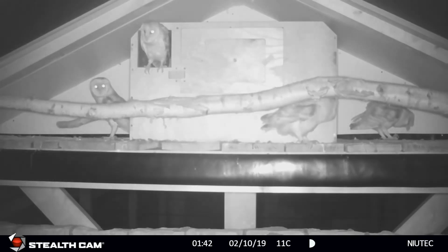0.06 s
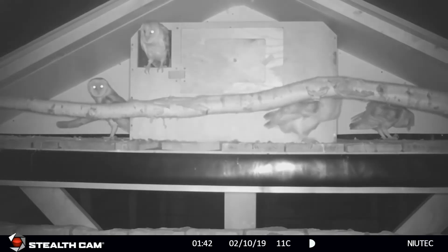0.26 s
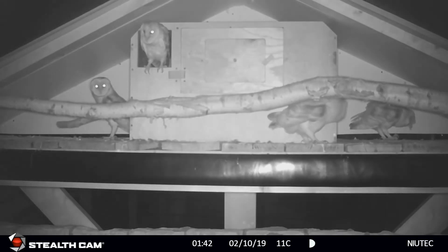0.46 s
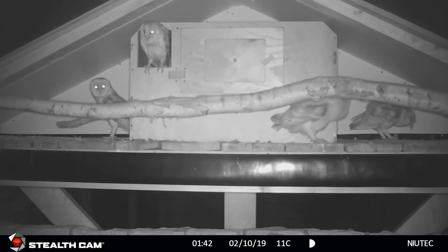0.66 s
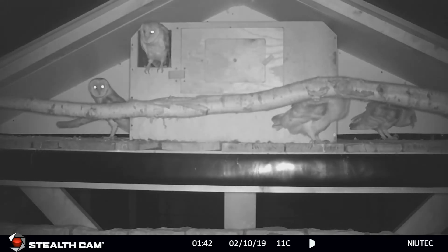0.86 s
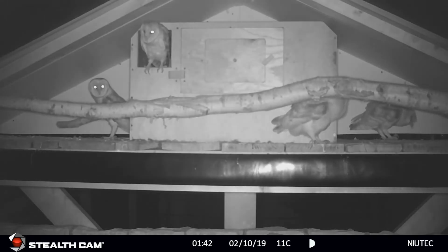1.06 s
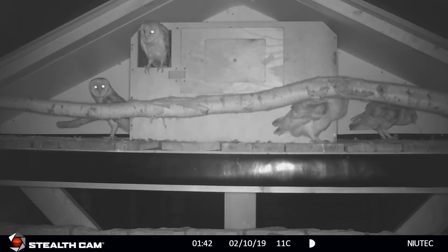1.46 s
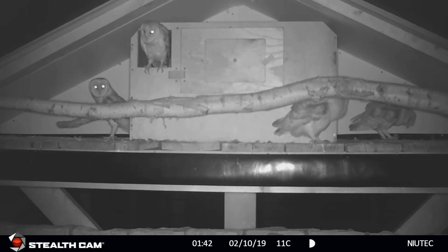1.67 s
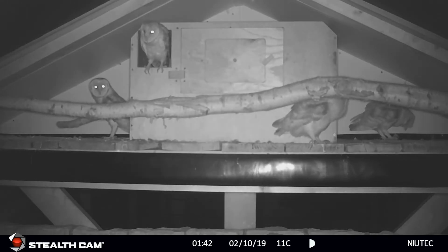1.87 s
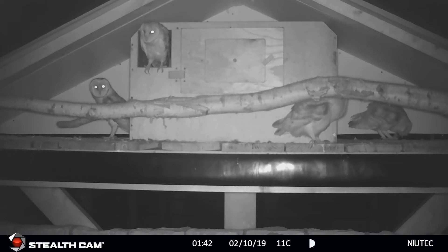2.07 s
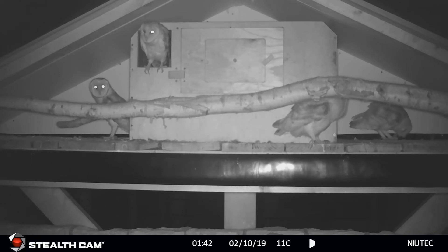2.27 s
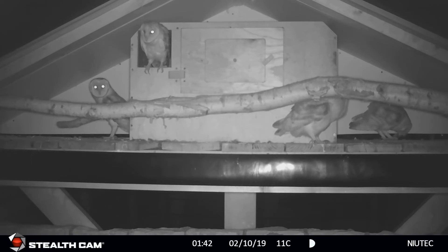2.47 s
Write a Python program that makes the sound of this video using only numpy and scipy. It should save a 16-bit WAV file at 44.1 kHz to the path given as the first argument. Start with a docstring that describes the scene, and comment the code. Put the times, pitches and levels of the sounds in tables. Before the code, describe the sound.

A barn owl screeches in a wooden loft. After a soft microphone pop at the very start, the harsh, rasping screech sputters in at about 0.1 seconds, swells loud and stops just before 1 second. From about 1.7 to 2.2 seconds comes a much softer, thinner owl hiss. Each call rings briefly off the boards, and faint steady background noise runs throughout.

```python
"""Barn owls in a wooden loft

Heard in mono on a trail camera. One owl gives a long, harsh screech: rushing air and irregular spits
of its throat, with a fixed colour. A softer, thinner hiss follows close to the boards, the beak
opening and closing. The loft rings briefly; the camera starts with a soft pop over faint steady noise."""
import sys
import numpy as np
from scipy import signal
from scipy.fft import rfft, irfft, next_fast_len
from scipy.io import wavfile
from scipy.ndimage import uniform_filter1d, minimum_filter1d

SR = 44100
rng = np.random.default_rng(int(sys.argv[2]) if len(sys.argv) > 2 else 0)


def digitize_waveform(pressure):
    """Quantize a signal to 16-bit integers and store it at the path in sys.argv[1].

    Rows of a 2-D input are taken as channels; values are limited to [-1, 1].
    """
    field = np.atleast_2d(pressure).T
    bounded = np.clip(field, -1, 1)
    quanta = np.round(bounded * 32767).astype(np.int16)
    wavfile.write(sys.argv[1], SR, quanta)


N = 110250

# broad shape of the screeching owl's throat: f/Hz, gain/dB
SCREECH_THROAT = [(300, -36), (550, -34), (1100, -36.5), (1900, -28), (2600, -9.5), (4000, 0.0),
                  (6200, -0.5), (7500, -11.5), (9000, -13), (11300, -18.4), (12700, -34.6), (15500, -35)]
# sharp peaks and dips from throat, near boards and microphone: f/Hz, width/Hz, gain/dB
SCREECH_PEAKS = [(2530, 71, -7), (3160, 185, -8.5), (3760, 50, -2.5), (4190, 310, 4.5), (4500, 98, 6),
                 (4647, 400, -11.5), (5330, 160, -7.5), (5620, 50, 2), (6780, 270, -7.5), (6960, 50, 8.5),
                 (7464, 350, 8.5), (8100, 410, -12.5), (8250, 200, 9), (9090, 450, -11), (10100, 350, -6.5),
                 (10670, 100, 4)]


def amp(db):
    """Decibels to gain."""
    return 10 ** (np.asarray(db) / 20)


def unit(x):
    """Scaled to rms 1."""
    return x / np.sqrt(np.mean(x ** 2) + 1e-20)


def along(points, hz):
    """A table of f/Hz, value, read on a log frequency axis."""
    f, values = np.transpose(points)
    return np.interp(np.log(hz + 1), np.log(f + 1), values)


def curve(rows, column=1, outside=None):
    """One column of a timed table, per sample."""
    rows = np.array(rows)
    return np.interp(np.arange(N) / SR, rows[:, 0], rows[:, column], outside, outside)


def coloured(x, gain_db):
    """x through a minimum-phase filter whose gain in dB is a function of frequency."""
    m = 2 * next_fast_len(N)
    cepstrum = irfft(np.log(amp(gain_db(np.fft.rfftfreq(m, 1 / SR))) + 1e-6))
    cepstrum[1:m // 2] *= 2
    cepstrum[m // 2 + 1:] = 0
    return irfft(rfft(x, m) * np.exp(rfft(cepstrum)))[:N]


def noise(colour):
    """Steady noise of rms 1, shaped by a table of f/Hz, gain/dB."""
    return unit(coloured(rng.standard_normal(N), lambda f: along(colour, f)))


def camera_noise(start_s=.039, floor_db=-52, pop_db=-25.5, pop_decay_s=.0087):
    """The microphone comes on with a soft pop; then steady noise and a faint mains hum."""
    # colour of the noise floor: f/Hz, gain/dB
    floor_colour = [(15, -25), (28, -2), (90, -4.5), (260, -7), (500, -10), (1000, -15), (2000, -18.5),
                    (4000, -22.5), (9000, -24.5), (12500, -28.5), (15700, -32)]
    # mains lines: f/Hz, level/dB
    mains = [(60, -66), (120, -67), (181, -66)]
    t = np.arange(N) / SR - start_s
    floor = amp(floor_db) * noise(floor_colour)
    hum = sum(amp(db) * unit(np.sin(2 * np.pi * (hz * t + rng.random()))) for hz, db in mains)
    pop = amp(pop_db) * np.exp(-abs(t) / pop_decay_s)
    return (t >= 0) * (floor + hum + pop)


def loft(level_db, colour, wet_db):
    """The short diffuse ring of the wooden loft, fed by noise that follows a call's level."""
    # ring time of the loft: f/Hz, T60/s
    t60 = [(500, 0.31), (5000, .43), (12000, .35)]
    hz, t, bands = signal.stft(rng.standard_normal(SR // 2), SR, nperseg=256)
    decay = amp(-60 * t / along(t60, hz)[:, None])
    tail = signal.istft(bands * decay, SR, nperseg=256)[1]
    feed = amp(level_db + wet_db) * noise(colour)
    return signal.fftconvolve(feed, tail / np.linalg.norm(tail))[:N]


def walls(x, echo_db, count=14, spread_s=.03):
    """Near boards add weak early reflections."""
    delays = (rng.uniform(.1, 1, count) * spread_s * SR).astype(int)
    echoes = sum(rng.choice([-1, 1]) * np.pad(x, (d, 0))[:N] for d in delays)
    return x + amp(echo_db) * echoes / np.sqrt(count)


def airflow(level_db, colour, top_db, growth=.25):
    """Plain rushing air that lasts as long as the call and grows only slowly with its effort."""
    gain = amp(top_db + growth * (level_db - level_db.max())) * (level_db > -100)
    return gain * noise(colour)


def rasp(spits_per_s, spit_share, scatter_db=2.5, low_hz=1800):
    """Turbulent air that, above low_hz, breaks into spits of uneven spacing and size."""
    air, chance = rng.standard_normal(N), rng.standard_normal((N // 8, 3))
    due = np.flatnonzero(np.diff(np.floor(np.cumsum(spits_per_s) / SR)))[:len(chance)]
    late, size, sign = chance[:len(due)].T
    at = (due + .4 * late * SR / spits_per_s[due]).astype(int) % N  # jitter: 0.4 of the mean interval
    kicks = np.sign(sign) * amp(scatter_db * np.clip(size, -2, 2))
    spits = unit(np.bincount(at, kicks, N) / np.sqrt(spits_per_s))
    f = np.fft.rfftfreq(N, 1 / SR)
    spit_power = spit_share * f ** 4 / (f ** 4 + low_hz ** 4)
    return irfft(np.sqrt(spit_power) * rfft(spits) + np.sqrt(1 - spit_power) * rfft(air), N)


def call_colour(x, shape, peaks):
    """Fixed colour as heard: the throat's broad shape; peaks and dips from throat, boards and mic."""
    def gain_db(f):
        return along(shape, f) + sum(db / (1 + (2 * (f - hz) / width) ** 2) for hz, width, db in peaks)
    return coloured(x, gain_db)


def voiced(air, level_db, shape, peaks, fully_weak_db=18.5):
    """Air given a call's colour and level; with less effort it is flatter and a little brighter."""
    # change of colour in a weak call: f/Hz, gain/dB
    weak_colour = [(500, 4), (1500, 5.5), (2800, 1.5), (4200, -2.5), (6200, 0.5), (8500, 2.5), (11000, 2.5),
                   (14000, 1.5)]
    full = unit(call_colour(air, shape, peaks))
    weak = unit(coloured(full, lambda f: along(weak_colour, f)))
    weakness = np.clip((level_db.max() - level_db) / fully_weak_db, 0, 1)
    return amp(level_db) * (weakness * weak + (1 - weakness) * full)


def beak(width_hz=310):
    """A narrow band of noise that rises and falls as the beak opens and closes."""
    # beak resonance: t/s, f/Hz, level/dB
    resonance = [(1.72, 1400, -77), (1.77, 1616, -63), (1.92, 2050, -60), (2.07, 2020, -58),
                 (2.12, 1620, -56), (2.145, 1265, -56), (2.17, 1120, -80)]
    lowpass = signal.butter(2, width_hz / 2, fs=SR, output='sos')
    slow = signal.sosfilt(lowpass, rng.standard_normal((2, N)))
    phase = 2 * np.pi * np.cumsum(curve(resonance)) / SR
    band = unit(slow[0] * np.cos(phase) + slow[1] * np.sin(phase))
    return amp(curve(resonance, column=2, outside=-120)) * band


def soft_hiss(spits_per_s=1200):
    """An owl close to the boards hisses thinly, more air than spits."""
    # effort of the hiss: t/s, level/dB
    effort = [(1.742, -63), (1.765, -50), (1.80, -45), (1.832, -37.5), (1.95, -34.5), (2.05, -34.5),
              (2.11, -43), (2.15, -62)]
    # broad shape of this owl's throat: f/Hz, gain/dB
    shape = [(300, -31.5), (580, -21), (900, -35.5), (2200, -20.5), (3300, -26.5), (4300, -14.5),
             (5400, -17), (6100, -0.5), (7500, -8), (8400, -25), (10400, -23), (15000, -45.5)]
    # sharp peaks and dips from throat, near boards and microphone: f/Hz, width/Hz, gain/dB
    peaks = [(4120, 110, 7.5), (4600, 130, -4.5), (4910, 74, 4.5), (5260, 100, -10), (5630, 77, -7.5),
             (5970, 88, 5), (6410, 590, -9.5), (6560, 120, 9), (6970, 100, -9), (10100, 80, 5.5)]
    # colours of the plain airflow and of the loft's answer: f/Hz, gain/dB
    flow_colour = [(300, -8), (600, 0), (900, -12), (1700, -3), (3200, -6), (4300, 2), (5300, -6),
                   (12000, -20)]
    ring_colour = [(1000, -22), (4000, -14), (5500, -11), (6400, -1), (7400, -4.5), (8500, -17),
                   (14000, -32)]
    # echoes off the boards beside the owl: delay/s, gain
    boards = [(.003662, .26), (.002341, -.12), (.00267, -.12), (.004609, -.11), (.008333, .1)]
    level_db = curve(effort, outside=-120)
    air = rasp(np.full(N, spits_per_s), spit_share=.3)
    call = voiced(air, level_db, shape, peaks) + beak() + airflow(level_db, flow_colour, top_db=-49)
    f = np.fft.rfftfreq(N, 1 / SR)
    comb = 1 + sum(gain * np.exp(-2j * np.pi * f * delay) for delay, gain in boards)
    by_boards = irfft(rfft(call) * comb, N)
    return walls(by_boards, echo_db=-12) + loft(level_db, ring_colour, wet_db=-9.5)


def first_spits():
    """The screech catches with a few separate spits, each ringing with the call's colour."""
    # single spits: t/s, level/dB
    onsets = [(.1344, -33), (.1420, -28.5), (.1513, -23), (.1624, -20.5), (.1752, -13.5), (.2157, -9.5)]
    kicks = np.zeros(N)
    for t, db in onsets:
        kicks[round(t * SR)] = amp(db)
    spits = call_colour(kicks, SCREECH_THROAT, SCREECH_PEAKS)
    return spits * kicks.max() / abs(spits).max()


def screech(top_spits_per_s=1050, spit_growth=.45):
    """The long, harsh call: more effort makes the spits denser and the sound louder and more focused."""
    # effort of the screech: t/s, level/dB
    effort = [(.134, -60), (.154, -37), (.19, -27.5), (.255, -21.5), (.295, -16.5), (.552, -12),
              (.875, -13), (.908, -17.5), (.926, -29), (.937, -54)]
    # colours of the plain airflow and of the loft's answer: f/Hz, gain/dB
    flow_colour = [(200, -15), (530, 2.5), (950, -8.5), (1600, 2.5), (2500, 2.5), (6000, -13)]
    ring_colour = [(1000, -41), (2200, -25.5), (2900, -13.5), (3700, -10.5), (4500, -4), (5100, -0.5),
                   (6000, -5.5), (7500, -6.5), (8300, -12.5), (10000, -20.5), (11500, -20), (13000, -34)]
    level_db = curve(effort, outside=-120)
    slack_db = np.minimum(level_db.max() - level_db, 30)
    spits_per_s = top_spits_per_s * amp(-spit_growth * slack_db)
    air = walls(rasp(spits_per_s, spit_share=.58), echo_db=-11)
    call = voiced(air, level_db, SCREECH_THROAT, SCREECH_PEAKS)
    flow = airflow(level_db, flow_colour, top_db=-46)
    return call + flow + first_spits() + loft(level_db, ring_colour, wet_db=-12.5)


def scene():
    """Both calls at the camera's one microphone, the same in both channels."""
    mono = screech() + soft_hiss() + camera_noise()
    return np.array([mono, mono])


def record(dry):
    """The loudest peaks are held smoothly to full scale; nothing is kept above the band limit."""
    hold_s, top_hz = .001, 15750
    hold = round(hold_s * SR)
    needed_gain = 1 / np.maximum(abs(dry), 1)
    gain = uniform_filter1d(minimum_filter1d(needed_gain, 2 * hold), hold)
    m = 2 * next_fast_len(N)
    passband = np.fft.rfftfreq(m, 1 / SR) < top_hz
    return irfft(rfft(dry * gain, m) * passband, m)[:, :N]


dry = scene()
out = record(dry)
digitize_waveform(out)
```